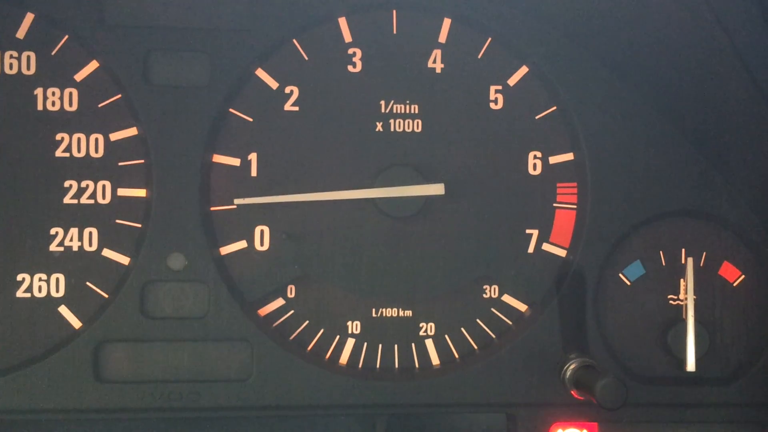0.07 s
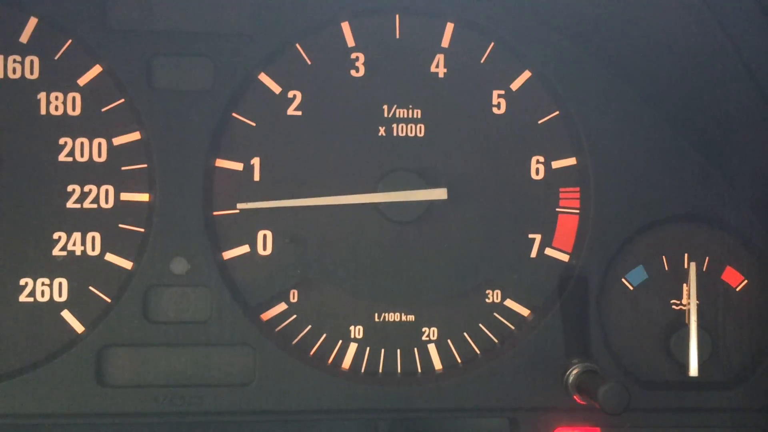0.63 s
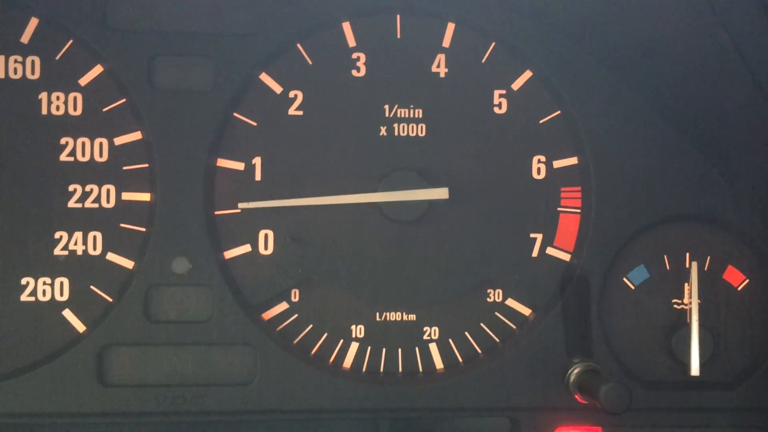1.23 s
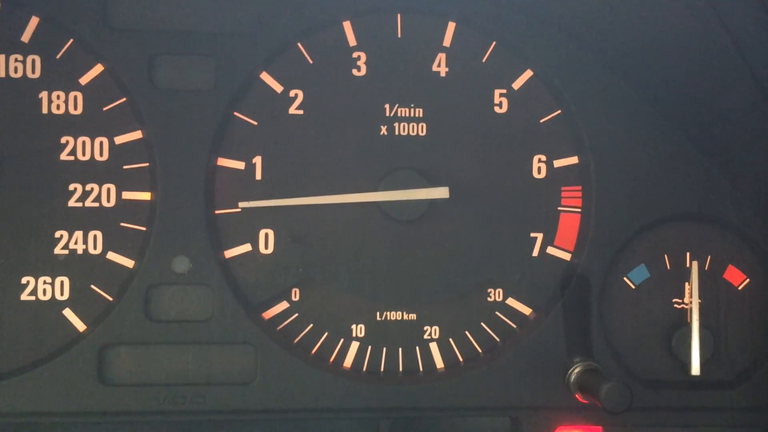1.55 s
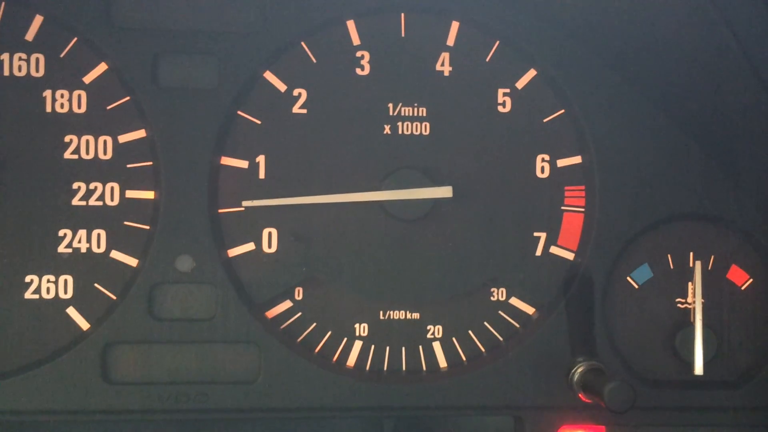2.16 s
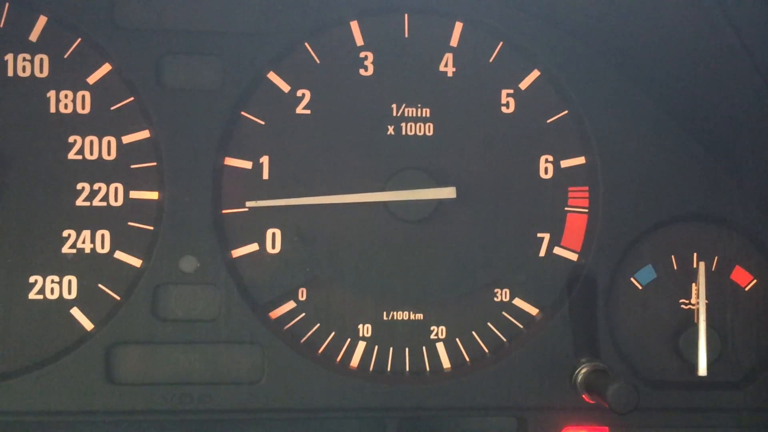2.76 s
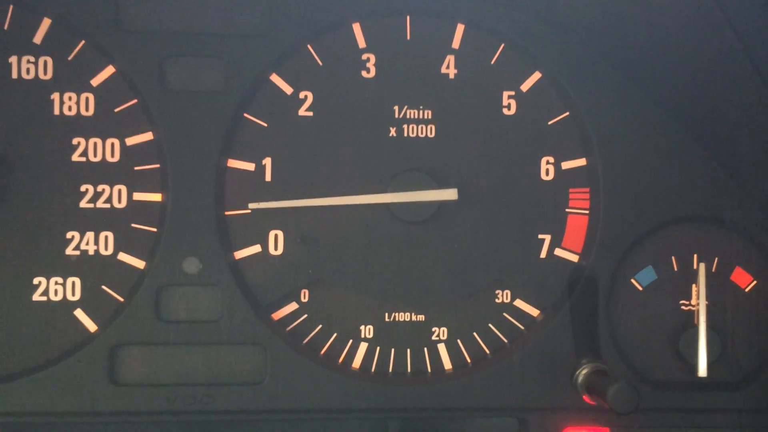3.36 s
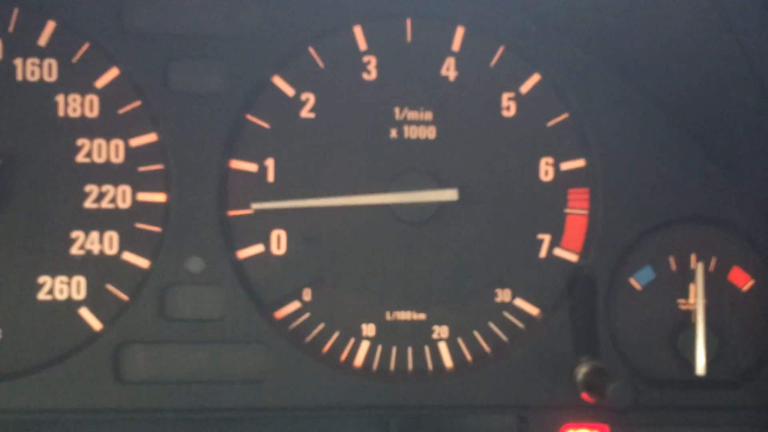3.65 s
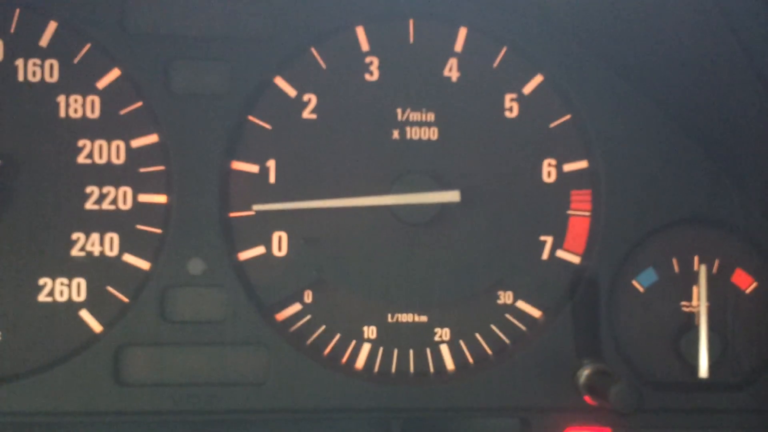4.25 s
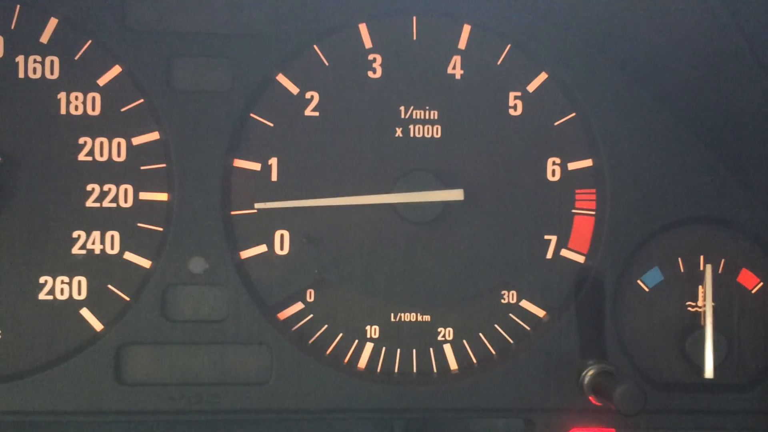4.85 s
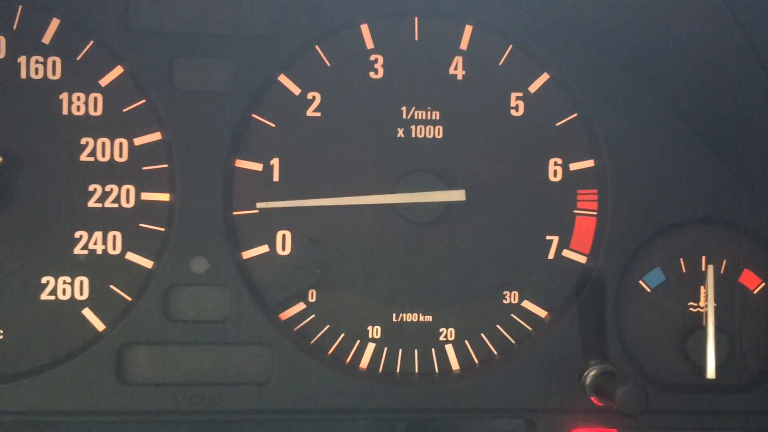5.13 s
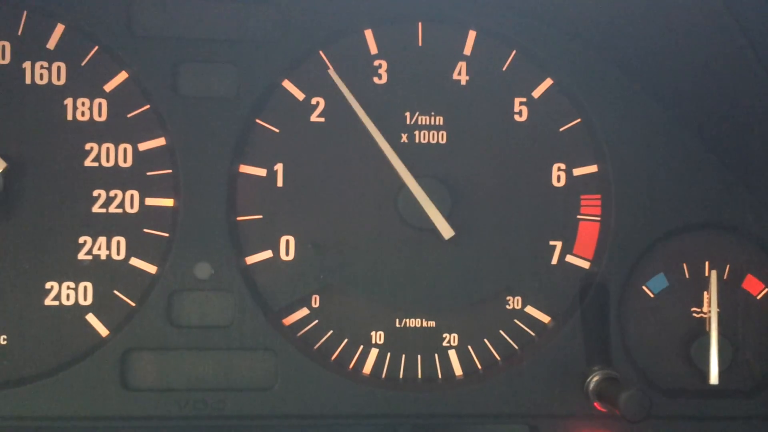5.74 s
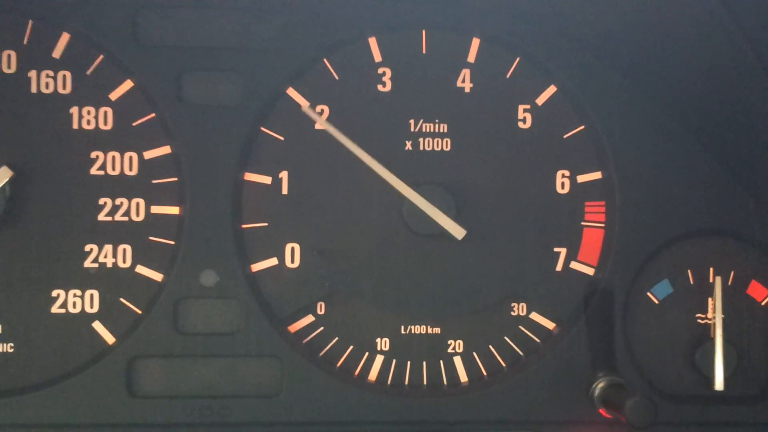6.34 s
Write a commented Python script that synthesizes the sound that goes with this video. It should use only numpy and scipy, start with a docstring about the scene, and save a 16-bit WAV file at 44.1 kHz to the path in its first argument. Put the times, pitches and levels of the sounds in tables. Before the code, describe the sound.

Inside a car, a V8 rumbles at idle as a vehicle drones past outside, then one quick throttle blip booms and falls away.

```python
"""A V8 idles with a soft lope, heard from the driver's seat: its firings boom through the exhaust pipe
and its knocks ring in the cabin. Near the end the throttle is blipped: the intake hisses, the boom
sweeps upward, and the engine runs down with a rough clatter, a burble and a falling alternator whine.
Behind it the fuel pump and fan hum, the trim ticks, and midway another vehicle drones past outside."""
import sys
import numpy as np
from scipy import signal
from scipy.fft import rfft, irfft
from scipy.io import wavfile

SR = 44100
rng = np.random.default_rng(int(sys.argv[2]) if len(sys.argv) > 2 else 0)


def digitize_waveform(pressure):
    """Quantize a signal to 16-bit integers and store it at the path in sys.argv[1].

    Rows of a 2-D input are taken as channels; values are limited to [-1, 1].
    """
    field = np.atleast_2d(pressure).T
    bounded = np.clip(field, -1, 1)
    quanta = np.round(bounded * 32767).astype(np.int16)
    wavfile.write(sys.argv[1], SR, quanta)


N = 286209
TIME = np.arange(N) / SR
BINS = np.maximum(np.arange(N // 2 + 1) * SR / N, 1)   # Hz

# ring of the cabin's panels and air: (frequency [Hz], width [Hz], lift [dB])
CABIN_MODES = [(194, 24, 1.5), (246, 21, 4), (308, 11, 2), (348, 11, 2.5), (460.2, 11.4, 9.5),
               (656, 40, 5.5), (707, 19, 3.5), (925, 110, 7), (1340, 107, 5), (1650, 360, 3)]
# tone of the exhaust pipe: (frequency [Hz], relative level [dB])
PIPE_COLOUR = [(12, -25), (30, 7), (70, -1), (160, -0.5), (210, -20), (300, -20), (500, -18), (1200, -62)]
# ring of the exhaust pipe: (frequency [Hz], width [Hz], lift [dB])
PIPE_MODES = [(56.8, 26.3, 6.8), (128, 39, 3.7), (162.4, 37, 3.2)]


def from_db(db):
    """Decibels to gain."""
    return 10 ** (np.asarray(db) / 20)


def rms_one(x):
    """Scale to unit power."""
    return x / np.sqrt(np.mean(x ** 2) + 1e-20)


def tone(turns):
    """A sine of unit power."""
    return np.sqrt(2) * np.cos(2 * np.pi * turns)


def ramp(start_s, length_s):
    """A straight rise from 0 to 1."""
    return np.clip((TIME - start_s) / length_s, 0, 1)


def swell(peak_s, half_s):
    """A smooth rise to 1 and fall again."""
    return np.exp(-((TIME - peak_s) / half_s) ** 2)


def snap(start_s, db, t60):
    """An instant attack that dies by 60 dB in t60 seconds."""
    return from_db(db - 60 * np.maximum(TIME - start_s, 0) / t60) * (TIME >= start_s)


def drift(rate):
    """A smooth random wander through `rate` values a second; spread about 1."""
    knots = rng.standard_normal(int(rate * N / SR) + 8)
    smooth = signal.resample_poly(knots, 8, 1)
    return np.interp(TIME * rate * 8, np.arange(len(smooth)), smooth)


def settling(start, changes):
    """A speed with inertia: after each change it glides toward its new goal."""
    speed = np.full(N, float(start))
    for s, goal, lag_s in changes:
        i = int(s * SR)
        speed[i:] = goal + (speed[i] - goal) * np.exp(-TIME[:N - i] / lag_s)
    return speed


def over_hz(points):
    """A curve through (Hz, value) points, read at every frequency bin."""
    hz, value = np.transpose(points)
    return np.interp(np.log(BINS), np.log(hz), value)


def resonance_db(at_hz, modes):
    """The lift that resonant peaks give at these frequencies."""
    return sum(peak_db / (1 + (2 * (at_hz - hz) / width) ** 2) for hz, width, peak_db in modes)


def coloured(x, colour, modes=()):
    """Give a sound a broad colour and resonant peaks; unit power."""
    eq_db = over_hz(colour) + resonance_db(BINS, modes)
    return rms_one(irfft(rfft(x) * from_db(eq_db), N))


def diffuse(pair):
    """Two unrelated signals as a sound field: centred in the bass, wide in the treble."""
    # likeness of the two ears: (frequency [Hz], correlation [0-1])
    likeness = [(60, .93), (130, .86), (280, .72), (620, .64), (1340, .05), (2900, 0)]
    mid, side = rfft(pair)
    alike = np.clip(over_hz(likeness), 0, 1)
    return irfft(np.sqrt(1 + alike) * mid + np.sqrt(1 - alike) * side * [[1], [-1]], N)


def noise():
    """Diffuse white noise."""
    return diffuse(rng.standard_normal((2, N)))


def hum(flutter_db=2):
    """A faint bed of tones from the fuel pump and fan; the higher ones waver more in pitch."""
    # pump and fan tones: (frequency [Hz], level [dB])
    partials = [(146, -54.5), (303, -53.5), (437, -58), (665, -71), (887, -66.5), (935, -72)]
    bed = 0
    for hz, db in partials:
        gain = from_db(db + flutter_db * drift(9))
        bed = bed + gain * tone(hz * (TIME + 5e-4 * drift(2) + 1.2e-4 * drift(22)))
    return bed


def trim_ticks(t60=0.058, gain_db=-2.0):
    """The cabin trim gives short bright snaps that die at once."""
    # ticks of the trim: (time [s], relative level [dB])
    ticks = [(0.597, -46.5), (1.9025, -47.5), (1.9699, -49), (2.2853, -47), (2.3715, -50), (2.9475, -46.5),
             (4.0322, -46.5), (4.145, -47.5), (5.228, -52), (6.3599, -43.5)]
    # their bright tone: (frequency [Hz], relative level [dB])
    tick_colour = [(500, -21), (2000, -3), (4000, -0.5), (6800, 2), (10000, -14), (15000, -18)]
    envelope = sum(snap(s, db, t60) for s, db in ticks)
    return from_db(gain_db) * envelope * coloured(noise(), tick_colour)


def passing_vehicle(start_hz=67.5, nearest_s=3.04, passing_s=0.88, tyre_db=-42, waver_db=1.0):
    """A drone with tyre noise nears, eases off and recedes, dulled by the closed cabin."""
    # it gathers speed, then slows: (time [s], firing rate it heads for [Hz], lag [s])
    speed_changes = [(0, 82, 1.65), (2.8, 60, 3.4)]
    # three harmonics, each booming briefly on the way past:
    # (base level [dB], fade with distance [exponent], boom time [s], boom lift [dB])
    harmonics = [(-39, .05, 2.8, 5), (-41, 1.3, 3.07, 11.5), (-47, .9, 2.55, 3)]
    # muffled tyre roar: (frequency [Hz], relative level [dB])
    tyre_colour = [(45, -18), (110, 4), (250, -2.5), (400, -6.5), (560, -13), (780, -12.5), (1050, -15.5),
                   (1400, -24), (1900, -25.5), (3000, -22.5), (5000, -31), (10000, -40)]
    ease_s, drop_db, recede_db_per_s = 2.93, 3, 4.5   # the drone drops, then keeps dying away
    turns = np.cumsum(settling(start_hz, speed_changes)) / SR
    distance = np.hypot(1, (TIME - nearest_s) / passing_s)   # 1 when nearest
    eased_db = drop_db * ramp(ease_s, 0.061) + recede_db_per_s * np.maximum(TIME - ease_s, 0)
    drone = 0
    for k, (db, fade, boom_s, boom_db) in enumerate(harmonics, 1):
        level_db = db - eased_db + boom_db * swell(boom_s, half_s=.19) + waver_db * drift(6)
        drone = drone + from_db(level_db) / distance ** fade * tone(k * turns + .02 * drift(6))
    tyres = from_db(tyre_db) / distance * coloured(noise(), tyre_colour, CABIN_MODES)
    return drone + tyres


def alternator(cycles, coast, low_hz=600, high_hz=870, level_db=-46.5):
    """Whines fall with the coasting crank and flutter with the belt; the bulkhead passes one band."""
    # belt-driven whines: (order [multiple of the cycle rate], relative level [dB])
    whines = [(38.5, 0), (42.4, -10), (45.8, -5), (49.2, -4)]
    cycle_hz = np.gradient(cycles) * SR
    whine = 0
    for order, db in whines:
        hz = order * cycle_hz
        passed = 1 / np.sqrt((1 + (hz / high_hz) ** 20) * (1 + (low_hz / hz) ** 20))
        whine = whine + passed * from_db(db + 2 * drift(14)) * tone(order * cycles + .05 * drift(25))
    return from_db(level_db) * coast * whine


def intake(pace, airflow_db=-60.5):
    """Air hisses past the throttle plate at each gulp and with speed, ringing faintly in the duct."""
    # gulps of air: (start [s], attack [s], end [s], release [s], level [dB])
    gulps = [(4.54, .05, 5.21, .02, -58), (4.79, .1, 5.135, .03, -56.5), (5.213, .025, 5.345, .13, -47.6)]
    # airy hiss: (frequency [Hz], relative level [dB])
    intake_colour = [(800, -13), (1900, -6), (2600, -2.5), (3600, -4.5), (4600, -2.5), (7000, -4),
                     (9000, -13), (14000, -23)]
    # ring of the duct: (frequency [Hz], width [Hz], lift [dB])
    duct_modes = [(2930, 320, 4), (4480, 140, 4), (6760, 600, 1)]
    gulping = sum(from_db(db) * (ramp(start, attack_s) - ramp(end, release_s))
                  for start, attack_s, end, release_s, db in gulps)
    envelope = np.hypot(gulping, from_db(airflow_db) * pace)
    return envelope * coloured(noise(), intake_colour, duct_modes)


def throttle():
    """Each sudden move of the throttle plate gives a short chuff in the manifold."""
    # the plate snaps wide, then claps shut: (time [s], level [dB], t60 [s])
    moves = [(5.227, -33, 0.16), (5.461, -35, 0.043)]
    # hollow chuff: (frequency [Hz], relative level [dB])
    chuff_colour = [(200, -23), (700, 13), (1100, -26), (1550, -9.5), (2200, -12), (6000, -30),
                    (14000, -36)]
    envelope = sum(snap(s, db, t60) for s, db, t60 in moves)
    return envelope * coloured(noise(), chuff_colour)


def knocks(cycles, size=512):
    """The same ragged run of valve and piston knocks comes round every engine cycle."""
    patterns = rng.standard_normal((2, size))
    loops = [rms_one(np.interp(cycles % 1, np.arange(size) / size, p, period=1)) for p in patterns]
    return diffuse(np.array(loops))


def mechanics(cycles, pace, pull, cylinders=8, idle_db=-42, speed_db=-24, load_db=-40.5):
    """Knocks and noise that surges at each firing ring through the cabin; speed and load add clatter."""
    # dark idle rumble: (frequency [Hz], relative level [dB])
    idle_colour = [(15, -39), (30, 9.5), (55, -9), (100, -5), (150, 0), (200, -8.5), (350, -10),
                   (520, -19.5), (800, -24.5), (1100, -27.5), (1900, -30), (4000, -40), (9000, -60)]
    # rough revving clatter: (frequency [Hz], relative level [dB])
    rev_colour = [(15, 10), (40, 1), (80, -2), (130, 1.5), (200, -5), (350, 1), (520, -12), (750, -13),
                  (1100, -22), (1900, -30), (3000, -30.5), (5000, -38.5), (8000, -45), (14000, -76)]
    # a throb at each firing, and a gentler one each cycle
    surge = 1 + 0.17 * np.cos(2 * np.pi * cylinders * cycles) + 0.056 * np.cos(2 * np.pi * cycles)
    rumble = coloured(noise() * surge + from_db(-6.5) * knocks(cycles), idle_colour, CABIN_MODES)
    clatter = coloured(noise() * surge + from_db(-12.5) * knocks(cycles), rev_colour, CABIN_MODES)
    clatter_gain = np.hypot(from_db(speed_db) * pace ** 1.19, from_db(load_db) * pull)
    return from_db(idle_db) * rumble + clatter_gain * clatter


def burble(cycles, pace, coast, cylinders=8, scatter=.15, floor_db=-35.5):
    """On the overrun each firing comes with its own strength and a little off time, thudding the pipe."""
    # bouts of weak, uneven firings: (time [s], level [dB], half length [s])
    bouts = [(5.47, -29, 0.066), (5.83, -25, 0.11), (6.2, -30.5, .06)]
    swells = sum(from_db(db) * swell(s, half_s) for s, db, half_s in bouts)
    envelope = np.hypot(swells, from_db(floor_db) * pace * coast)
    fires = np.diff(np.floor(cylinders * cycles + scatter * drift(90)), prepend=0) > 0
    puffs = coloured(fires * rng.standard_normal(N), PIPE_COLOUR, PIPE_MODES)
    return envelope * puffs / np.std(puffs[coast > 0])


def exhaust_lope(cycles, revved, cylinders=8, dispersion=.05, level_db=-43, rev_lift_db=12):
    """Unequal cylinders add tones that swell together once a cycle at idle."""
    # lope tones: (order [multiple of the cycle rate], idle weight [dB], revved weight [dB])
    orders = [(2, -25, -5), (3, -12, 0), (4, -15, -12), (5, -11, -11), (6, -7, -2), (7, 0, -3),
              (9, -13, -9), (10, -11, -12), (12, -10, -12), (13, -14, -7), (14, -22, -8), (16, -9, -10),
              (18, -20, -8), (24, -8, -13)]
    lope, power = 0, 0
    for order, idle_db, rev_db in orders:
        gain = from_db(idle_db + revved * (rev_db - idle_db))
        # the pipe delays each order differently; at speed its echoes pull them right out of step
        lag = dispersion * (order - cylinders) ** 2 + revved * rng.random()
        waver = (.025 + .12 * revved) * drift(14)
        lope = lope + gain * tone(order * cycles + lag + waver)
        power = power + gain ** 2
    shudder_db = 8 * swell(peak_s=5.24, half_s=.06)   # as the throttle snaps wide
    return from_db(level_db + rev_lift_db * revved + shudder_db) * lope / np.sqrt(power)


def exhaust_boom(cycles, revved, pull, coast, cylinders=8, base_db=-40.5, growl_db=-18):
    """Eight firings a cycle make a note that booms as it sweeps through the pipe's resonances."""
    firings = cylinders * cycles
    firing_hz = np.gradient(firings) * SR
    load_db = 15.5 * pull - 11 * coast
    flicker_db = (.5 + 1.5 * revved) * drift(25)
    note = tone(firings) + revved * from_db(growl_db) * tone(2 * firings)   # harder firings are sharper
    return from_db(base_db + load_db + flicker_db + resonance_db(firing_hz, PIPE_MODES)) * note


def scene(idle_rpm=698, top_rpm=2700):
    """Crank speed and load drive the engine amid the cabin's sounds; the bass leans to the left."""
    # the throttle sends the crank toward a new speed: (time [s], goal [rpm], lag [s])
    speed_changes = [(1.4, 726, .3), (2.8, 698, .15), (4.97, 1300, .26), (5.21, 2950, .19),
                     (5.6, 700, 1.22)]
    # stereo tilt at the seat: (frequency [Hz], left minus right [dB])
    balance = [(50, 6.5), (110, 4), (200, 2.5), (370, 1), (670, -0.8), (1230, -0.5), (2260, 2), (4130, 2.3),
               (8000, -7), (13000, 0)]
    rpm = settling(idle_rpm, speed_changes)
    cycles = np.cumsum(rpm / 120) / SR   # two turns to a four-stroke cycle
    cycles = cycles - np.interp(4.485, TIME, cycles)   # the engine cycle is at phase zero at this moment
    revved = np.clip((rpm - 750) / 1000, 0, 1)   # blend from idle tone to revved tone
    pace = np.maximum(rpm - idle_rpm, 0) / (top_rpm - idle_rpm)   # 0 at idle, 1 at top speed
    coast = ramp(start_s=5.37, length_s=.17)   # the throttle shuts
    pull = ramp(start_s=4.925, length_s=.25) - coast   # the engine pulls hard during the blip
    tailpipe = exhaust_boom(cycles, revved, pull, coast) + exhaust_lope(cycles, revved)
    tailpipe = tailpipe + burble(cycles, pace, coast)
    engine_bay = mechanics(cycles, pace, pull) + alternator(cycles, coast) + intake(pace) + throttle()
    cabin = tailpipe + engine_bay + hum() + trim_ticks() + passing_vehicle()
    return irfft(rfft(cabin) * from_db(over_hz(balance) * [[.5], [-.5]]), N)


def record(dry, hiss_db=-54.5, low_hz=30, high_hz=14500):
    """The microphones drop the deepest bass and add their own hiss; the top is cut steeply."""
    # nearly flat hiss: (frequency [Hz], relative level [dB])
    hiss_colour = [(500, -2), (2000, -1.5), (5000, -2), (9000, -2.5), (14500, -3.5)]
    hiss = from_db(hiss_db) * coloured(rng.standard_normal((2, N)), hiss_colour)
    edge_fade = np.clip(np.minimum(TIME, TIME[-1] - TIME) / .004, 0, 1)
    low_cut = 1 / np.sqrt(1 + (low_hz / BINS) ** 6)
    high_cut = np.clip((high_hz - BINS) / 100 + .5, 0, 1)
    return irfft(rfft(dry * edge_fade + hiss) * low_cut * high_cut, N)


dry = scene()
out = record(dry)
digitize_waveform(out)
```